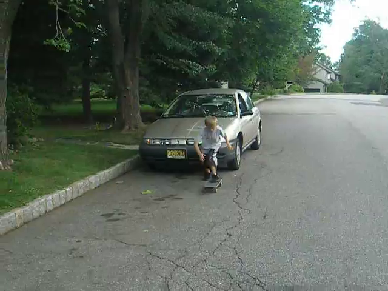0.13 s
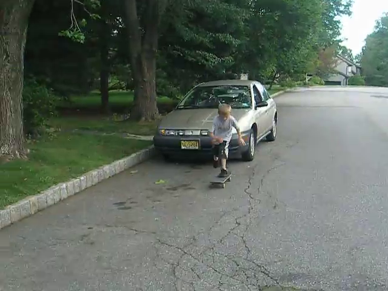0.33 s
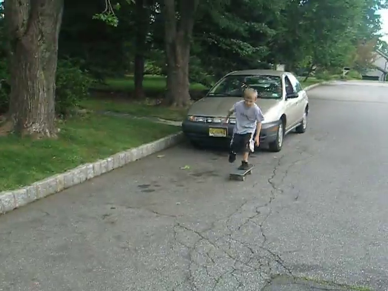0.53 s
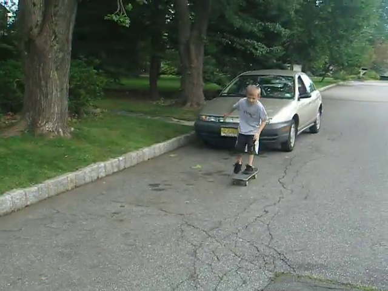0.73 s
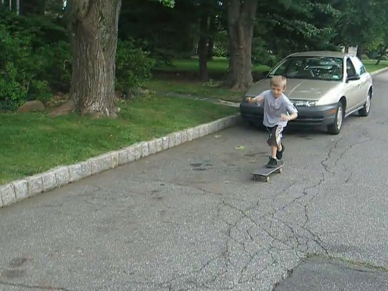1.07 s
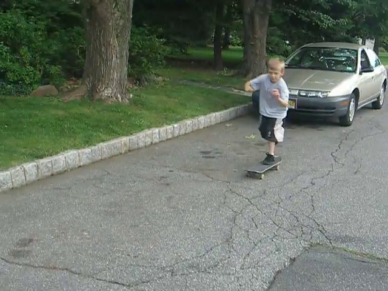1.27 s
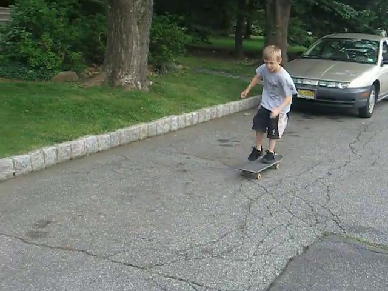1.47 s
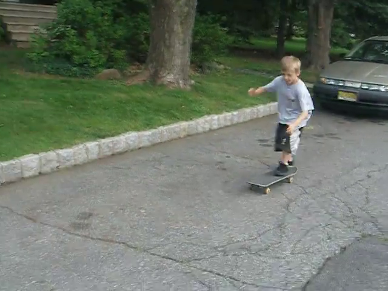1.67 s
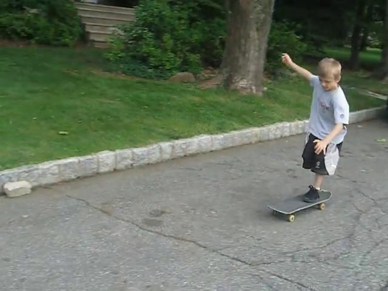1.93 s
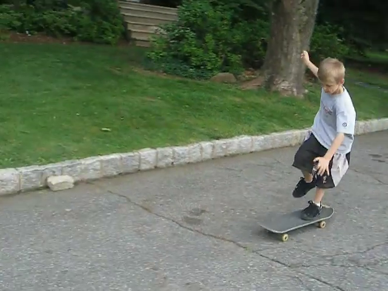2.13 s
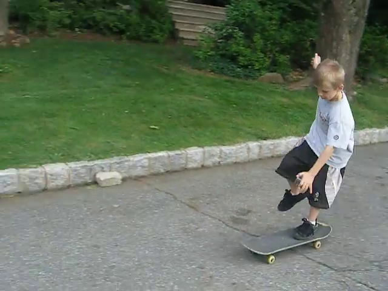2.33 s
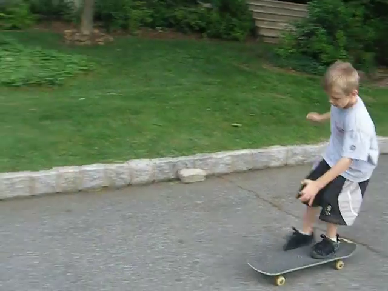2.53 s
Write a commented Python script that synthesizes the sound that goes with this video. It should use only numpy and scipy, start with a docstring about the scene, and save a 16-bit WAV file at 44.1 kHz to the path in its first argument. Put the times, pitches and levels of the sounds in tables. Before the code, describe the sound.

Skateboard wheels clatter faintly on a quiet street, then swell from about one second into a loud, gritty, woody roll with sharp rattles over cracks, ending close to a small, muffled, narrow-band camera microphone.

```python
"""A faint, ringing clatter grows into a loud, woody roll: a child on a skateboard comes toward us
over coarse, cracked asphalt. Random grit impacts drum on a resonant deck; listed cracks and stones set
the metal trucks rattling. Early jolts tend to ring more than later ones; the deck's tone fills out.
Low rumble, two dull thuds, short echoes and faint street air lie beneath.
A small camera with a narrow band picks it up."""
import sys
import numpy as np
from scipy import signal
from scipy.fft import rfft, irfft
from scipy.io import wavfile
from scipy.ndimage import uniform_filter1d

SR = 44100
rng = np.random.default_rng(int(sys.argv[2]) if len(sys.argv) > 2 else 0)


def to_wav(sig):
    """Store sig (one row per channel, or 1-D mono) as 16-bit WAV at the path in sys.argv[1].

    Samples outside -1..1 are clipped; the rate is SR.
    """
    pcm = np.clip(np.atleast_2d(sig), -1, 1) * 32767
    pcm = np.round(pcm).astype(np.int16)
    wavfile.write(sys.argv[1], SR, pcm.T)  # frames by channels


N = 119070


# level of the wheels rolling on grit: start_s, level_db
ROLL_LEVEL = [(0.09, -32.5), (0.15, -29), (0.36, -27), (0.46, -28), (0.53, -31), (0.7, -34), (0.84, -32),
              (0.93, -25), (1.07, -20), (1.19, -20), (1.32, -25), (1.46, -22), (1.62, -20), (1.75, -21),
              (1.81, -23), (1.91, -24), (1.97, -21), (2.11, -22), (2.22, -18.5), (2.36, -18.5), (2.45, -24),
              (2.51, -20), (2.59, -21), (2.64, -25), (2.69, -20)]
# power share of the close, woody tone: start_s, share_0_to_1
NEAR_SHARE = [(0.1, 0.26), (1.0, 0.4), (1.4, 0.16), (1.84, 0.39), (2.0, 0.35), (2.3, 0.89), (2.69, 0.88)]
# broad tone of the wheels from afar: pitch_hz, gain_db
FAR_WHEEL_TONE = [(60, -47), (150, -34), (350, -10.5), (600, 3.5), (950, 2.5), (1300, -2), (1600, 1),
                  (1850, 4), (2100, -1.5), (2600, -5), (3200, -13), (3700, -9), (4200, -31.5)]
# broad tone of the wheels close by: pitch_hz, gain_db
NEAR_WHEEL_TONE = [(60, -43.5), (150, -31.5), (350, -10), (600, 0), (1000, -0.5), (1550, 2), (2000, -8),
                   (2350, -2), (2600, -6.5), (3100, -1.5), (3700, -11.5), (4200, -21)]
FAR_DECK_SHARE = 0.34   # scales the deck's lift_db from afar


def rolling():
    """Grit drums on the deck, whose tone fills out as the board comes near."""
    near = in_time(NEAR_SHARE)
    far_sound = rms_one(deck(grains(FAR_WHEEL_TONE), FAR_DECK_SHARE))
    near_sound = rms_one(deck(grains(NEAR_WHEEL_TONE)))
    blend = np.sqrt(1 - near) * far_sound + np.sqrt(near) * near_sound
    return from_db(in_time(ROLL_LEVEL)) * steady(blend)


# borders between the parts of the board: pitch_hz
GRIT_BORDERS_HZ = [1150, 2780]
GRIT_SHARED_POWER = 0.4
PATCH_HZ, PATCH_SPREAD_DB = 71, 1.5   # coarse and smooth patches under the wheels


def grains(tone):
    """Grit in the board's tone: some impacts shake all of it, others only its low, middle or high part."""
    low_hz, high_hz = GRIT_BORDERS_HZ
    own = np.zeros(N)
    for kind, edge_hz in (("low", low_hz), ("band", [low_hz, high_hz]), ("high", high_hz)):
        part_filter = signal.butter(2, edge_hz, kind, fs=SR, output="sos")
        own += signal.sosfilt(part_filter, grit())
    impacts = np.sqrt(GRIT_SHARED_POWER) * grit() + np.sqrt(1 - GRIT_SHARED_POWER) * own
    patches = from_db(PATCH_SPREAD_DB * drift(PATCH_HZ))
    return colour(impacts * patches, tone)


GRIT_PER_S, GRIT_SPREAD_DB = 1100, 4.0


def grit():
    """Tiny impacts of the wheels on stones: random times, signs and exponentially spread dB sizes."""
    size_db = GRIT_SPREAD_DB * np.minimum(rng.exponential(1, N), 3.5)
    sizes = from_db(size_db) * rng.choice([-1, 1], N)
    return sizes * (rng.random(N) < GRIT_PER_S / SR)


# resonances of the deck, lift before share scaling and overlap: pitch_hz, width_hz, lift_db
DECK_MODES = [(378, 34, 1.5), (653, 45, 10), (845, 50, 8), (1390, 23, 1), (1660, 120, 1), (2097, 35, 7),
              (2230, 40, 8), (2408, 85, 2), (2910, 65, 4), (3260, 49, 4)]


def deck(x, share=1):
    """The board lifts its own resonances out of whatever shakes it, then disperses the sound."""
    lifted = x.copy()
    for pitch_hz, width_hz, lift_db in DECK_MODES:
        lifted += (from_db(share * lift_db) - 1) * resonance(x, pitch_hz, width_hz)
    return disperse(lifted)


# where bending waves linger: pitch_hz, width_hz
BENDING_DELAYS = [(700, 880), (1300, 600), (1900, 300), (2500, 1300), (3200, 320)]


def disperse(x):
    """Bending waves linger around some pitches: all-pass stages spread a click into a brief rasp."""
    for pitch_hz, width_hz in BENDING_DELAYS:
        r = np.exp(-np.pi * width_hz / SR)
        a = [1, -2 * r * np.cos(2 * np.pi * pitch_hz / SR), r * r]
        x = signal.lfilter(a[::-1], a, x + 1e-18)
    return x


# wheels hit cracks and stones; ring relative to wood, treble a nominal lift of the wood:
# start_s, rattle_length_s, level_db, ring_db, ring_pitch_hz, treble_db
JOLT_HITS = [(.119, 0.015, -21, 2.5, 1850, -3.5), (.191, 0.011, -27, 3, 1790, -18),
             (.248, 0.015, -27.5, -1, 1810, -6), (0.327, .008, -25.5, 10, 1880, 1.5),
             (.343, 0.02, -25.5, -1, 1750, -1), (0.367, 0.021, -26.5, 7.5, 1800, -7.5),
             (.414, 0.02, -21, 8.5, 1790, -14), (0.439, 0.013, -25, 4.5, 1780, -4.5),
             (.476, .009, -22.5, 5, 1800, -1), (0.545, 0.024, -30.5, 0, 1850, 0),
             (0.578, 0.0062, -25.5, 9, 1850, -3), (0.611, 0.0065, -27, 1, 1740, -1),
             (.641, 0.0069, -33.5, 5, 1800, 3), (.760, .014, -25, 3, 1820, 0),
             (0.865, 0.0071, -21.5, 7, 1850, 5), (.897, 0.0024, -22.5, 7.5, 1780, -5.5),
             (.908, 0.034, -23, 7.5, 1790, -13), (.948, 0.0022, -15, 9, 1850, -5),
             (.965, .011, -23, 6.5, 1790, -1), (0.995, 0.0069, -16.5, 1, 1950, -0.5),
             (1.008, 0.0066, -17.5, -8.5, 1790, -8), (1.036, .004, -11, 2.5, 1770, -9.5),
             (1.059, .008, -11, -7, 2010, -2.5), (1.069, 0.011, -14.5, 2, 2270, -2),
             (1.082, .009, -13, -4.5, 1900, -0.5), (1.093, 0.014, -14.5, 6, 1850, -2),
             (1.129, 0.017, -19, -1, 1750, 2), (1.157, 0.0025, -14, 6, 1830, -5),
             (1.172, .005, -16.5, 0.5, 1750, -1.5), (1.180, .005, -15.5, -2.5, 1800, 9),
             (1.202, .015, -20.5, 1, 1700, 1), (1.293, .004, -21, -8, 1700, -5),
             (1.541, 0.016, -15.5, -0.5, 1850, -3), (1.587, 0.011, -12.5, -1, 1890, -1.5),
             (1.608, 0.011, -14.5, -6.5, 1780, -2.5), (1.695, 0.011, -13.5, 1, 1810, -10),
             (1.712, .01, -19.5, -6, 1700, -1), (1.741, 0.018, -13.5, -3.5, 1750, -6.5),
             (1.766, 0.0019, -8, 0.5, 2040, -7), (1.792, 0.0055, -20, 2.5, 1910, -9),
             (1.841, 0.0022, -11, 7.5, 1950, 1.5), (1.853, 0.0059, -17, 7, 2070, -2),
             (1.861, 0.0048, -17.5, -0.5, 2090, -1), (1.934, 0.0051, -18, -3, 1615, -13),
             (1.954, 0.012, -16, -7, 1540, -4), (1.969, 0.0041, -12.5, 10.5, 1550, -12),
             (1.995, 0.0046, -19.5, 0.5, 1600, 6.5), (2.021, 0.0079, -20, -6, 1600, 1),
             (2.065, 0.0073, -13.5, -11.5, 1500, -5), (2.087, 0.0045, -23, -1.5, 1550, -3),
             (2.202, 0.015, -17.5, 5, 1450, 10), (2.227, 0.005, -16, 6.5, 1450, 7.5),
             (2.254, .01, -19.5, -3, 1420, -9), (2.274, 0.008, -16.5, -14, 1450, -6),
             (2.326, 0.01, -19, -12.5, 1430, 6), (2.355, 0.0074, -19.5, -13.5, 1470, 5.5),
             (2.370, 0.0067, -15.5, -11, 1500, -2.5), (2.388, 0.0057, -16.5, -13, 1445, 7.5),
             (2.421, 0.0083, -13, 6.5, 1430, 11), (2.568, 0.01, -17.5, -3, 1450, 7.5),
             (2.578, 0.004, -11.5, 1, 1410, 4), (2.671, 0.0045, -21, -6, 1600, 2),
             (2.692, .003, -24.5, -15, 1450, 16)]
# broad tone of the rattle: pitch_hz, gain_db
RATTLE_WOOD_TONE = [(60, -47.5), (150, -31), (400, -4.5), (700, -5), (1100, 3), (1550, 0), (2100, -8.5),
                    (2600, -0.5), (3200, -5), (3700, -8.5), (4200, -25)]
CHATTER_PER_S, CHATTER_SPREAD_DB, FIRST_HIT_DB = 800, 3, 1.5
CHATTER_FADE_DB = 3.5   # over one rattle length
RING_OUT_S = 0.0026   # added to the rattle length when setting a jolt's energy
RING_WIDTH_HZ, UPPER_RATIO, UPPER_WIDTH_HZ, UPPER_DB = 309, 1.118, 456, -5
TREBLE_HZ, TREBLE_WIDTH_HZ = 3200, 1000


def chatter(length_s, size, count=48):
    """A hit and quick, uneven repeats that fade over the rattle length."""
    gaps_s = rng.uniform(.4, 1.6, count) / CHATTER_PER_S
    after_s = np.cumsum(gaps_s) - gaps_s[0]
    hit_db = CHATTER_SPREAD_DB * rng.standard_normal(count) - CHATTER_FADE_DB * after_s / length_s
    hits = from_db(hit_db) * rng.choice([-1, 1], count)
    hits[0] = from_db(FIRST_HIT_DB)
    return np.bincount((after_s * SR).astype(int), hits * (after_s < length_s), size)[:size]


def truck_ring(clicks, pitch_hz):
    """The metal trucks ring at one pitch and, inverted, at an upper partner."""
    main = resonance(clicks, pitch_hz, RING_WIDTH_HZ)
    upper = resonance(clicks, pitch_hz * UPPER_RATIO, UPPER_WIDTH_HZ)
    return main - from_db(UPPER_DB) * upper


def jolts(size=4096):
    """Each jolt is a chatter of the trucks, heard through deck and metal."""
    out = np.zeros(N + SR)
    for start_s, length_s, level_db, ring_db, ring_hz, treble_db in JOLT_HITS:
        clicks = chatter(length_s, size)
        metal = truck_ring(clicks, ring_hz)
        wood = deck(colour(clicks, RATTLE_WOOD_TONE))
        wood = wood + (from_db(treble_db) - 1) * resonance(wood, TREBLE_HZ, TREBLE_WIDTH_HZ)
        sound = rms_one(rms_one(wood) + from_db(ring_db) * rms_one(metal))
        energy_gain = np.sqrt((length_s + RING_OUT_S) * SR / size)
        start = int(start_s * SR)
        out[start:start + size] += from_db(level_db) * sound * energy_gain
    return out[:N]


# the deck flexes with a dull double thud: start_s, length_s, peak_level_db
DECK_THUDS = [(1.743, 0.0065, -30.5), (1.765, 0.004, -20)]


def thud():
    """Soft, low pushes from the flexing deck: negative half sines."""
    t = np.arange(N) / SR
    pushes = np.zeros(N)
    for start_s, length_s, level_db in DECK_THUDS:
        pushes -= from_db(level_db) * np.sin(np.pi * np.clip((t - start_s) / length_s, 0, 1))
    return pushes


# the wheels' low rumble, before RUMBLE_TRIM_DB: start_s, level_db
RUMBLE_LEVEL = [(0.15, -38), (0.29, -40), (0.38, -34), (0.55, -38), (0.65, -36), (0.75, -40), (0.98, -33),
                (1.2, -34), (1.42, -31.5), (1.62, -29), (1.75, -27), (1.775, -42), (1.86, -44), (1.94, -35),
                (2.15, -35), (2.3, -32), (2.42, -37), (2.55, -34), (2.69, -36)]
# tone of the rumble: pitch_hz, gain_db
RUMBLE_COLOUR = [(50, -34.5), (90, -19), (130, -11), (190, 0), (290, -1), (390, 3), (520, -1), (900, -32)]
RUMBLE_TRIM_DB = 0.5


def rumble():
    """The wheels ride up and down on the uneven surface: low, filtered noise."""
    noise = colour(rng.standard_normal(N), RUMBLE_COLOUR)
    return from_db(in_time(RUMBLE_LEVEL) + RUMBLE_TRIM_DB) * steady(noise, size=1801)


ECHO_DB, ECHO_T60_S, ECHO_DELAY_S = -19, 0.073, 0.015


def street(x):
    """Faint scatter from kerb, trees and a parked car: a delayed, decaying noise tail."""
    t = np.arange(SR // 2) / SR
    tail = rng.standard_normal(len(t)) * from_db(-60 * t / ECHO_T60_S) * (t > ECHO_DELAY_S)
    return x + from_db(ECHO_DB) * signal.fftconvolve(x, tail / np.linalg.norm(tail))[:N]


# level of the background: start_s, level_db
AIR_LEVEL = [(0.2, -45), (0.9, -46.5), (1.7, -51.5), (1.8, -61.5), (2.6, -56)]
# distant traffic and trees: pitch_hz, gain_db
AIR_COLOUR = [(30, -13), (70, -4), (130, 3), (220, 2.5), (400, -4), (1000, -26.5), (4000, -29.5)]


def air():
    """The quiet neighbourhood: low-weighted noise whose level sinks slowly, drops sharply around 1.75 s, then
    partly recovers."""
    return from_db(in_time(AIR_LEVEL)) * rms_one(colour(rng.standard_normal(N), AIR_COLOUR))


def from_db(db):
    """Decibels to gain."""
    return 10 ** (np.asarray(db) / 20)


def rms_one(x):
    """Scale to unit power."""
    return x / np.sqrt(np.mean(x ** 2) + 1e-20)


def steady(x, size=2001):
    """Unit power over a sliding window of size samples, keeping the fast grain."""
    return x / np.sqrt(uniform_filter1d(x * x, size) + 1e-12)


def in_time(rows):
    """A curve at every sample."""
    return np.interp(np.arange(N) / SR, *np.transpose(rows))


def drift(hz):
    """Smooth random wandering of spread 1: noise through two equal poles."""
    r = np.exp(-2 * np.pi * hz / SR)
    noise = rng.standard_normal(N + SR)
    return rms_one(signal.lfilter([1], [1, -2 * r, r * r], noise)[SR:])


def colour(x, tone, size=4096):
    """Causal (minimum-phase) filter that follows a pitch_hz, gain_db table."""
    hz, db = np.transpose(tone)
    bins_hz = np.arange(size // 2 + 1) * SR / size
    gain = from_db(np.interp(np.log(bins_hz + 1), np.log(hz), db))
    # folding the cepstrum forward gives minimum phase
    cepstrum = irfft(np.log(gain))
    cepstrum[1:size // 2] *= 2
    cepstrum[size // 2 + 1:] = 0
    impulse = irfft(np.exp(rfft(cepstrum)))
    return signal.fftconvolve(x, impulse)[:len(x)]


def resonance(x, hz, width_hz):
    """One two-pole resonance with gain 1 at its top."""
    r = np.exp(-np.pi * width_hz / SR)
    b = np.array([1, 0, -1]) * (1 - r * r) / 2
    a = [1, -2 * r * np.cos(2 * np.pi * hz / SR), r * r]
    return signal.lfilter(b, a, x + 1e-18)


def scene():
    """The whole board in the open street."""
    board = rolling() + jolts() + thud() + rumble()
    return (street(board) + air())[None]


START_S, CEILING = 0.035, 1
BAND_EDGE_HZ, CUTOFF_HZ = 4095, 4300


def record(dry):
    """The camera starts at START_S, rounds the peaks and cuts the treble with two steep low-passes."""
    started = np.arange(N) / SR > START_S
    x = CEILING * np.tanh(dry / CEILING) * started
    x = signal.sosfilt(signal.butter(12, BAND_EDGE_HZ, fs=SR, output="sos"), x)
    return signal.sosfilt(signal.ellip(10, .2, 90, CUTOFF_HZ, fs=SR, output="sos"), x)


dry = scene()
out = record(dry)
to_wav(out)
```